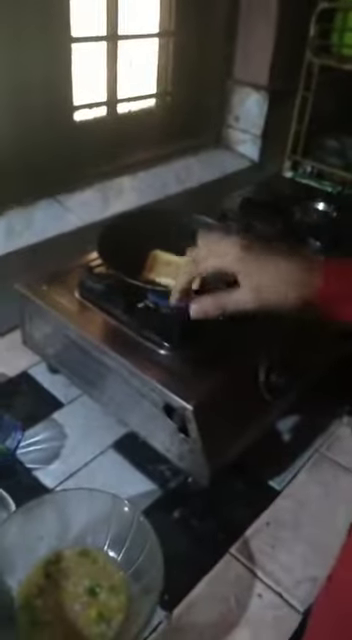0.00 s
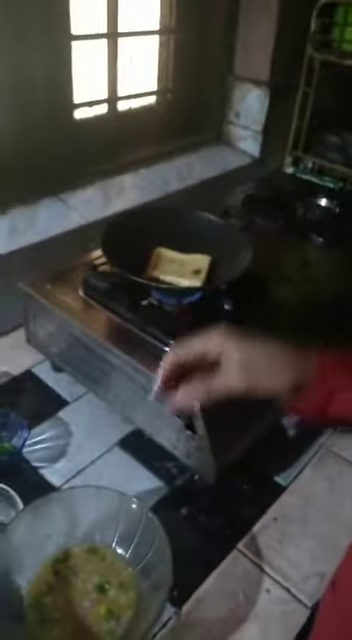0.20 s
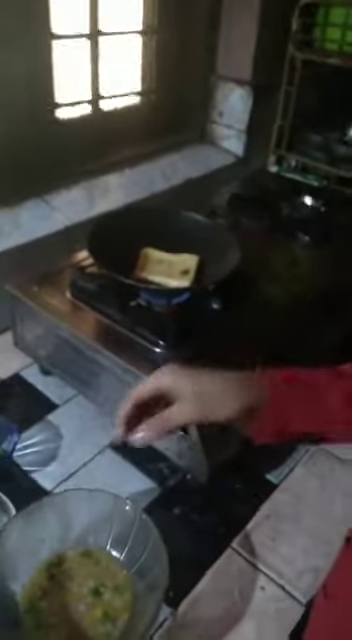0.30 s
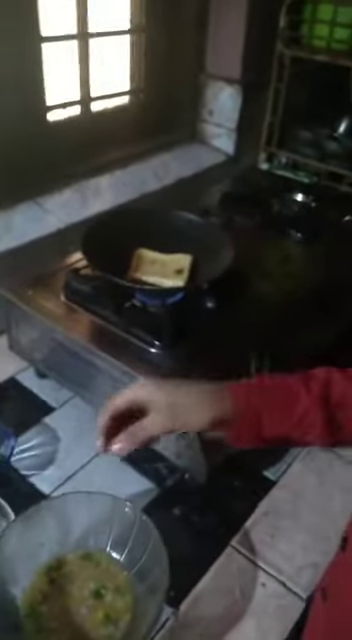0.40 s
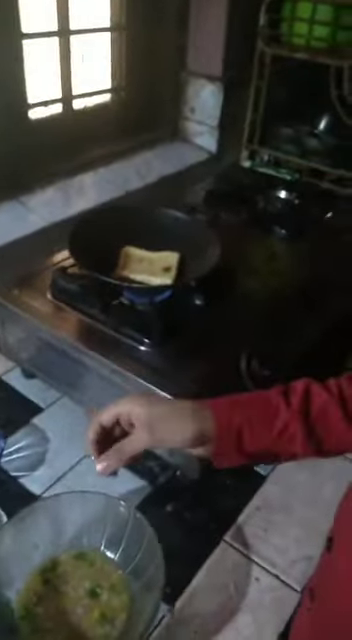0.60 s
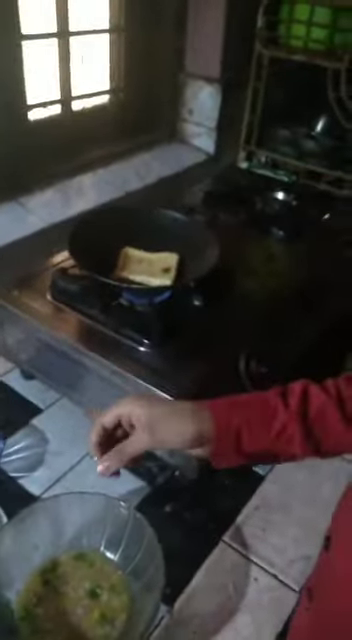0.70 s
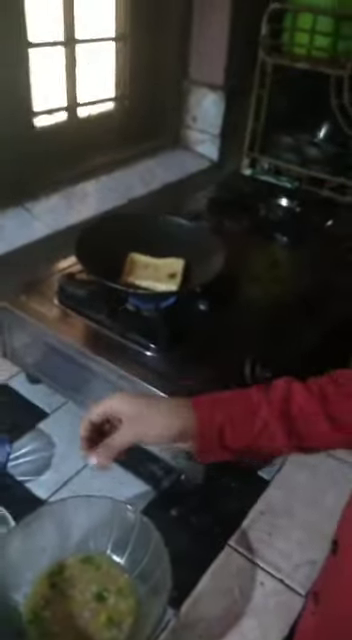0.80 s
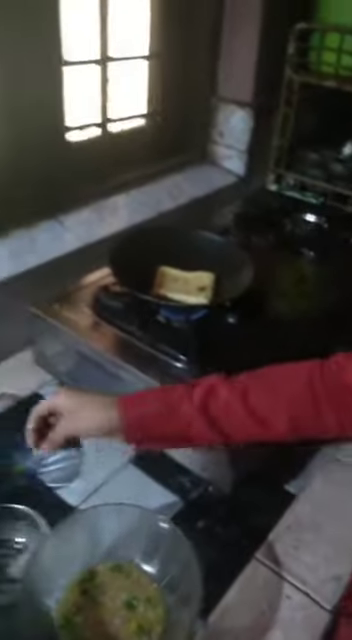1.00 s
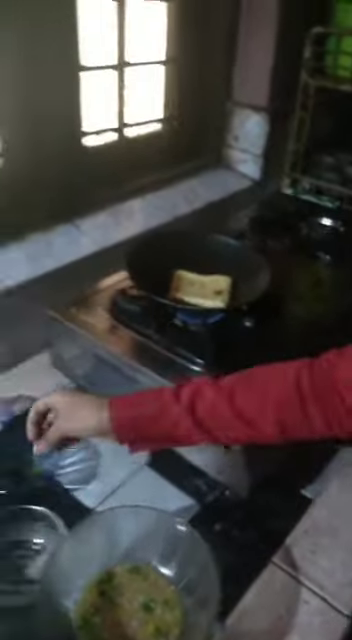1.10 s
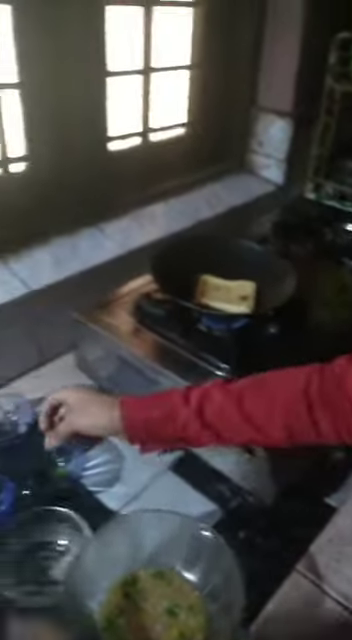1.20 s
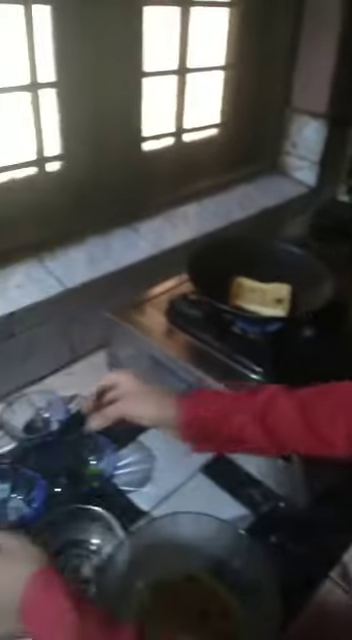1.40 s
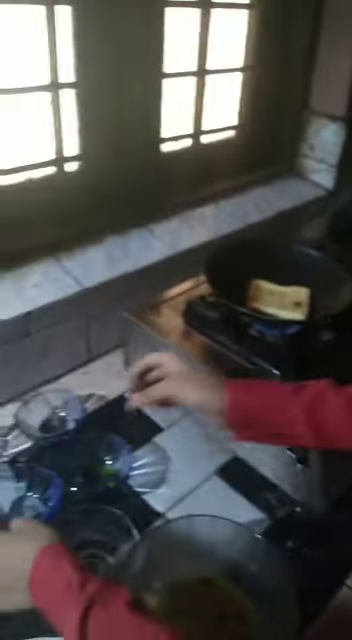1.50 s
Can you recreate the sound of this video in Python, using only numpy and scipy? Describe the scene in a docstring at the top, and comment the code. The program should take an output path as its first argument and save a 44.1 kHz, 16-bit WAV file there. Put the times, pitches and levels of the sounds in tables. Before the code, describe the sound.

Clinking glass bowls, one set down hard, followed by a spatula's brief clatter and scrape.

```python
"""Glass bowls and a steel spatula on a counter in a small, hard-walled kitchen, over a low rumble.
Two bowls clink, each blow a set of ringing modes, a clack and a thud of the counter.
A large bowl knocks down hard, slides and settles. A small bird chirps outside.
The spatula clatters and scrapes on glass in tiny slips, squeaking once. The bird chirps again."""
import sys
import numpy as np
from scipy import signal
from scipy.fft import rfft, irfft
from scipy.io import wavfile
from scipy.ndimage import uniform_filter1d, minimum_filter1d

SR = 44100
rng = np.random.default_rng(int(sys.argv[2]) if len(sys.argv) > 2 else 0)


def materialize(psi):
    """Save the field psi as 16-bit PCM at rate SR to the path in sys.argv[1].

    A 1-D psi becomes a single channel; in a 2-D psi each row is a channel.
    """
    bounded = np.clip(np.atleast_2d(psi).T, -1, 1)
    quanta = np.round(bounded * 32767).astype(np.int16)
    wavfile.write(sys.argv[1], SR, quanta)


N = 68355
T = np.arange(N) / SR
CONTACT_ATTACK_S = 0.00038

# start_s, level_db, tilt_db_per_octave, thud_db, direct_db
LARGE_BOWL_HITS = [(0.3684, 3.4, 0, -13.5, 0), (0.3724, 0.11, 1, -25.5, -0.55)]
RIM_TAPS = [(0.3335, -30, -3, 15, 2), (0.3440, -24, -6.5, 19.5, -0.5), (0.5237, -12, -1, -4, 1.4)]
# pitch_hz, level_db, t60_s
LARGE_BOWL_MODES = [(1008, -23, .08), (1476, -29, .16), (1744, -28, .1), (1825, -27, .15), (1946, -21, .13),
                    (2247, -24, .11), (2289, -22, .1), (2462, -24, .12), (2862, -27, .1), (3298, -22, .13),
                    (3640, -22, .07), (3950, -26, .09)]
# freq_hz, density_db
LARGE_BOWL_CLACK = [(300, -30.5), (720, -40.5), (1020, -6), (1250, -12.5), (2100, -2), (3500, -1.5),
                    (5200, -5.5), (6500, -13), (9000, -16.5), (11000, -23.5), (16000, -34)]
LARGE_BOWL_RUB = [(170, -9), (450, -10), (780, 0), (1250, -11), (1900, 6), (2600, -9), (3300, -2.5),
                  (5200, -13.5), (9000, -30.5), (16000, -46.5)]
# time_s, level_db
LARGE_BOWL_SLIDE = [(0.32, -38), (0.338, -36), (0.365, -25.5), (0.40, -38), (0.44, -36.5), (0.55, -37.5),
                    (0.605, -62), (0.625, -34.5), (0.69, -46), (0.74, -57.5), (0.77, -82)]


def large_bowl():
    """The large bowl lands, is touched lightly on the rim and drags on the counter."""
    landing = blows(LARGE_BOWL_HITS, LARGE_BOWL_MODES, LARGE_BOWL_CLACK)
    taps = blows(RIM_TAPS, LARGE_BOWL_MODES, LARGE_BOWL_CLACK, ring_db=0.5)
    return landing + taps + slide(LARGE_BOWL_SLIDE, LARGE_BOWL_MODES, LARGE_BOWL_RUB, ring_db=-10)


# pitch_hz, level_db, t60_s
KNOCK_MODES = [(1041, -19, 0.053), (2000, -9, 0.017), (2300, -6.5, 0.016), (3520, 2, 0.0099),
               (5490, -11.5, .012)]


def knock():
    """Heavily damped modes of the large bowl as it lands, heard at close range."""
    out = np.zeros(N)
    ring = sum(from_db(db) * np.sin(2 * np.pi * hz * T) * decay(t60) for hz, db, t60 in KNOCK_MODES)
    ring *= onset(CONTACT_ATTACK_S)
    for start_s, level_db, *_ in LARGE_BOWL_HITS:
        add(out, start_s, from_db(level_db) * ring)
    return out


# start_s, level_db, tilt_db_per_octave, thud_db, direct_db
SMALL_BOWL_HITS = [(0.0380, -9, -0.5, 1.5, -5), (0.0600, -22.5, -1, 3, 9)]
MIDDLE_BOWL_HITS = [(0.1970, -9.5, -0.068, -6, -0.9), (0.2690, -26.5, -1, 2.5, 1.3)]
# pitch_hz, level_db, t60_s
SMALL_BOWL_MODES = [(947, -19, .1), (1470, -26, .12), (1529, -23, .15), (2277, -21, .12), (3257, -21, .13),
                    (3305, -21, .13), (4032, -26, .14), (4867, -26, .16), (6627, -31, .15),
                    (8900, -27, .05)]
MIDDLE_BOWL_MODES = [(850, -28, .1), (958, -24, .09), (1475, -28, .14), (1830, -30, .13), (1930, -28, .1),
                     (2280, -27, .11), (2385, -29, .12), (3348, -18.5, .115), (3694, -19, .08),
                     (4550, -26, .08), (5400, -28, .06)]
# freq_hz, density_db
CLINK_CLACK = [(200, -24), (600, -17), (900, 1.5), (1200, -18), (1800, -5), (2700, -1), (3400, 1),
               (5200, -6.5), (7000, -11.5), (9000, -20.5), (11000, -29), (16000, -40)]


def clinks():
    """Two smaller bowls each ring from a blow and a lighter second touch."""
    small = blows(SMALL_BOWL_HITS, SMALL_BOWL_MODES, CLINK_CLACK)
    return small + blows(MIDDLE_BOWL_HITS, MIDDLE_BOWL_MODES, CLINK_CLACK, ring_db=2.5)


# start_s, level_db, tilt_db_per_octave, thud_db, direct_db
SPATULA_HITS = [(0.8745, -8, 0, -5.5, -2), (0.8819, -13, -3, -7, -4), (0.9535, -22, -4, -7, 0),
                (0.9722, -18, 4.5, -1, 1.5), (0.9845, -22.5, -4.5, -2, -4), (1.0420, -16, 1.5, -28, 5),
                (1.0490, -14.5, 1.5, -30, -2), (1.0630, -23, 2.5, 2.5, 12.5)]
# pitch_hz, level_db, t60_s
BLADE_MODES = [(420, -26, .12), (1030, -27, .08), (1826, -27, .07), (1944, -22, .07)]
SCRAPED_BOWL_MODES = [(2880, -30, .16), (3197, -26, .19), (3328, -28, .22), (3415, -26, .22),
                      (3962, -31, .22), (4409, -31, .2), (4745, -31, .22), (5380, -31, .18)]
# freq_hz, density_db
SPATULA_CLACK = [(200, -12), (600, -15), (1000, -1.5), (1300, -20.5), (1900, 11.5), (2500, -9),
                 (3400, -12.5), (5200, -3), (7000, -14.5), (11000, -26.5), (16000, -36)]
SPATULA_RUB = [(180, -15.5), (400, -3.5), (550, -21), (750, -3.5), (1250, -10.5), (2000, -3), (3400, 4.5),
               (5000, -6), (8000, -13), (10000, -25.5), (16000, -30.5)]
# time_s, level_db
SPATULA_SLIDE = [(0.856, -49), (0.864, -35.5), (0.94, -33.5), (0.985, -39), (1.01, -32), (1.04, -28),
                 (1.075, -31), (1.10, -26.5), (1.135, -37), (1.15, -58.5), (1.17, -77)]


def spatula():
    """The blade strikes and scrapes a bowl; steel and glass ring together."""
    modes = BLADE_MODES + SCRAPED_BOWL_MODES
    clatter = blows(SPATULA_HITS, modes, SPATULA_CLACK)
    return clatter + slide(SPATULA_SLIDE, modes, SPATULA_RUB, ring_db=-5)


# pitch_hz, level_db
SQUEAK_MODES = [(2075, -21.5), (3330, -19.5)]


def squeak(start_s=1.0172, length_s=0.0097, room_db=-18):
    """The blade catches on the glass: stick-slip drives two of its modes. Rows: direct, room feed."""
    t, out = T[T < length_s], np.zeros(N)
    tones = sum(from_db(db) * np.sin(2 * np.pi * hz * t) for hz, db in SQUEAK_MODES)
    add(out, start_s, tones * signal.windows.tukey(len(t), .5))
    return np.array([out, from_db(room_db) * out])


# freq_hz, density_db
COUNTER_THUD = [(50, -17.5), (120, -14), (270, 1.5), (400, 3), (650, -13.5), (1200, -19), (4000, -46.5)]


def contact(modes, clack_spectrum, tilt_db, thud_db, ring_db):
    """One blow: modes of random strength, a clack of dense fast-dying modes, the counter's thud."""
    size = SR // 2
    out = np.zeros(size)
    for hz, db, t60 in modes:
        mode_db = 5 + ring_db + db + rng.normal(0, 2)
        gain = rng.choice([-1, 1]) * from_db(mode_db) * tilt(hz, tilt_db)
        out += gain * np.cos(2 * np.pi * hz * T[:size]) * decay(t60, size)
    clack = noise(clack_spectrum, tilt_db, size=2048) * decay(t60_s=0.031, size=2048)
    thud = noise(COUNTER_THUD, size=4096) * decay(t60_s=0.095, size=4096)
    thud *= onset(attack_s=0.0004, size=4096)
    add(out, 0, from_db(-2) * clack)
    add(out, 0, from_db(thud_db - 20.5) * thud)
    return from_db(-6) * out * onset(CONTACT_ATTACK_S, size)


def blows(hits, modes, clack_spectrum, ring_db=0):
    """All blows on one body. Rows: direct, room feed."""
    direct, room_feed = np.zeros(N), np.zeros(N)
    for start_s, level_db, tilt_db, thud_db, direct_db in hits:
        blow = from_db(level_db) * contact(modes, clack_spectrum, tilt_db, thud_db, ring_db)
        add(direct, start_s, from_db(direct_db) * blow)
        add(room_feed, start_s, blow)
    return np.array([direct, room_feed])


def slide(level_curve, modes, rub_spectrum, ring_db, points=4, slips_per_s=500, spread_db=6.5):
    """Tiny slips at several contact points excite a dragged body; pressure weakens its ring."""
    level = from_db(np.interp(T, *np.transpose(level_curve), left=-200, right=-200))
    out = np.zeros(N)
    for _ in range(points):
        slipping = rng.random(N) < slips_per_s / points / SR
        slips = slipping * from_db(rng.normal(0, spread_db, N)) * rng.choice([-1, 1], N)
        body = contact(modes, rub_spectrum, tilt_db=0, thud_db=-12.5, ring_db=ring_db)
        out += excite(body, unit_rms(slips) * level)
    return out / np.sqrt(points)


# start_s, level_db
CHIRPS = [(0.786, -47), (1.528, -48.5)]
# time_s, pitch_hz, level_db
CHIRP_SHAPE = [(0, 3840, -20), (0.005, 3918, 8), (0.013, 3650, 7.5), (0.016, 3230, 14), (0.025, 2750, 0),
               (0.033, 2430, 6)]


def bird(octave_db=-21, direct_db=-8.5):
    """Falling whistles with a faint octave, heard mostly off the walls. Rows: direct, room feed."""
    time_s, hz, db = np.transpose(CHIRP_SHAPE)
    t, out = T[T < time_s[-1]], np.zeros(N)
    phase = 2 * np.pi * np.cumsum(np.interp(t, time_s, hz)) / SR
    whistle = np.sin(phase) + from_db(octave_db) * np.sin(2 * phase)
    chirp = from_db(np.interp(t, time_s, db)) * whistle
    for start_s, level_db in CHIRPS:
        add(out, start_s, from_db(level_db) * chirp)
    return np.array([from_db(direct_db) * out, out])


# freq_hz, t60_s
ROOM_DECAY = [(200, 0.37), (700, 0.3), (2000, 0.27), (5000, 0.26), (13000, 0.17)]


def kitchen(room_feed):
    """Diffuse reverberation of even colour that builds in a few ms and dies sooner in the treble."""
    hz = np.fft.rfftfreq(N, 1 / SR)
    white, tail = rfft(rng.standard_normal(N)), np.zeros(N)
    edges_hz = np.geomspace(40, 20000, 13)
    for low, high in zip(edges_hz, edges_hz[1:]):
        band = irfft(white * (hz >= low) * (hz < high), N)
        tail += band * decay(at_hz(ROOM_DECAY, np.sqrt(low * high)))
    spectrum = rfft(tail * onset(attack_s=0.0054))
    power = uniform_filter1d(np.abs(spectrum) ** 2, size=61)
    even_tail = irfft(spectrum / np.sqrt(power + .02 * power.mean()), N)[:SR // 2]
    return excite(even_tail, room_feed)


# freq_hz, density_db
RUMBLE_SPECTRUM = [(25, -33.5), (45, -12.5), (65, -5), (85, 0.5), (105, -13), (300, -20.5), (600, -26),
                   (1500, -31.5), (4000, -35), (16000, -51.5)]
# peak_s, level_db
SWELLS = [(0.395, -41), (1.115, -43), (1.315, -47.5), (1.444, -45.5)]


def rumble(level_db=-54, swell_hz=83.8, swell_width_s=0.02):
    """Low noise with faint hiss and a few soft swells."""
    out = from_db(level_db) * noise(RUMBLE_SPECTRUM)
    for peak_s, db in SWELLS:
        envelope = from_db(db) * np.exp(-((T - peak_s) / swell_width_s) ** 2)
        out += envelope * np.sin(2 * np.pi * (swell_hz * T + rng.random()))
    return out


def from_db(db):
    return 10 ** (np.asarray(db) / 20)


def unit_rms(x):
    return x / np.sqrt(np.mean(x ** 2) + 1e-20)


def at_hz(table, hz):
    """Table lookup on a log-frequency axis."""
    freqs_hz, values = np.transpose(table)
    return np.interp(np.log(hz + 1), np.log(freqs_hz), values)


def tilt(hz, db_per_octave):
    """Gain of a slope about 3 kHz, flat below 500 Hz."""
    return from_db(db_per_octave * np.log2(np.maximum(hz, 500) / 3000))


def noise(spectrum, tilt_db=0, size=N):
    """Coloured noise, rms 1."""
    hz = np.fft.rfftfreq(size, 1 / SR)
    phases = np.exp(2j * np.pi * rng.random(len(hz)))
    return unit_rms(irfft(phases * from_db(at_hz(spectrum, hz)) * tilt(hz, tilt_db), size))


def onset(attack_s, size=N):
    return 1 - np.exp(-(T[:size] / attack_s) ** 2)


def decay(t60_s, size=N):
    return np.exp(-np.log(1000) * T[:size] / t60_s)


def add(out, start_s, x):
    i = int(start_s * SR)
    out[i:i + len(x)] += x[:N - i]


def excite(response, drive):
    """Convolution with the response scaled to unit energy."""
    return signal.fftconvolve(drive, response / np.linalg.norm(response))[:N]


def scene():
    """Direct sound, reverberation and rumble, alike in both channels."""
    direct, room_feed = clinks() + large_bowl() + spatula() + squeak() + bird()
    mono = from_db(-3) * (direct + knock() + kitchen(room_feed)) + rumble()
    return np.array([mono, mono])


def record(dry):
    """Low cut, fast peak limiter, steep high cut."""
    low_cut = signal.butter(2, 42, "high", fs=SR, output="sos")
    high_cut = signal.ellip(10, .1, 80, 15900, fs=SR, output="sos")
    ceiling, hold_samples = 0.92, int(0.0029 * SR)
    filtered = signal.sosfilt(low_cut, dry)
    gain = ceiling / np.maximum(np.abs(filtered).max(axis=0), ceiling)
    gain = uniform_filter1d(minimum_filter1d(gain, hold_samples), hold_samples)
    return signal.sosfilt(high_cut, filtered * gain)


dry = scene()
out = record(dry)
materialize(out)
```